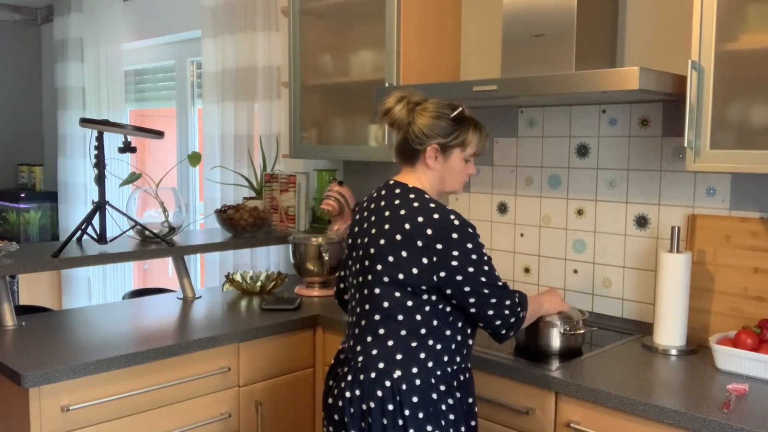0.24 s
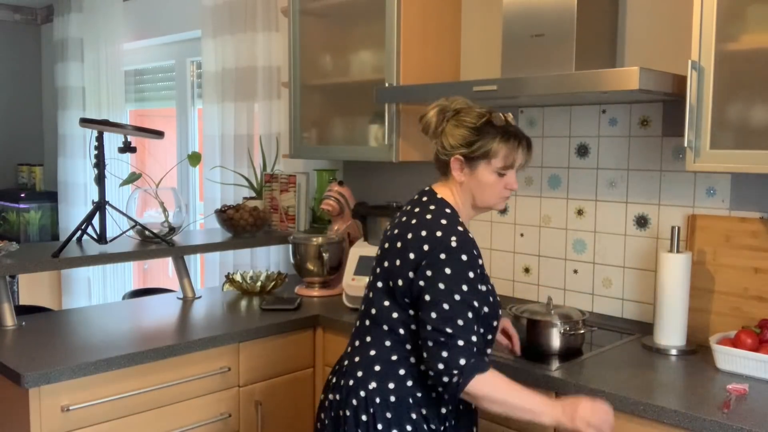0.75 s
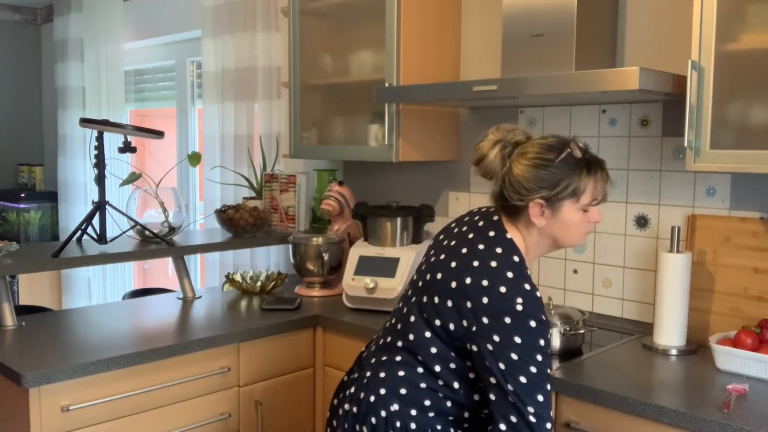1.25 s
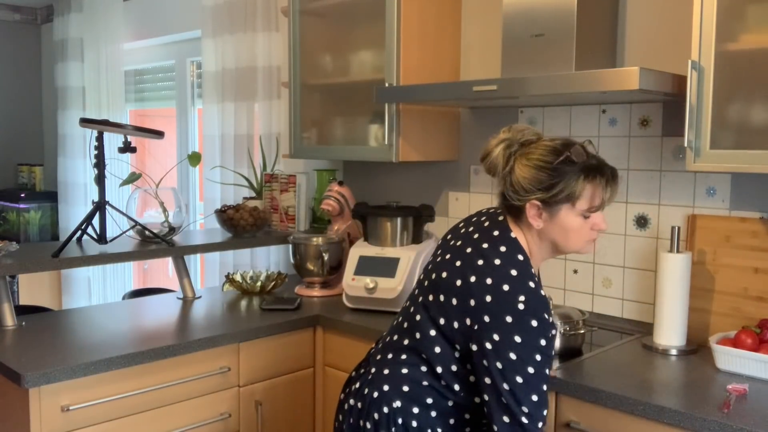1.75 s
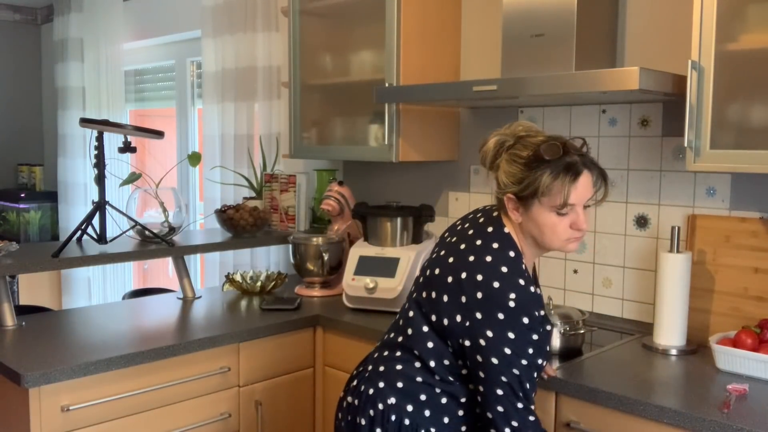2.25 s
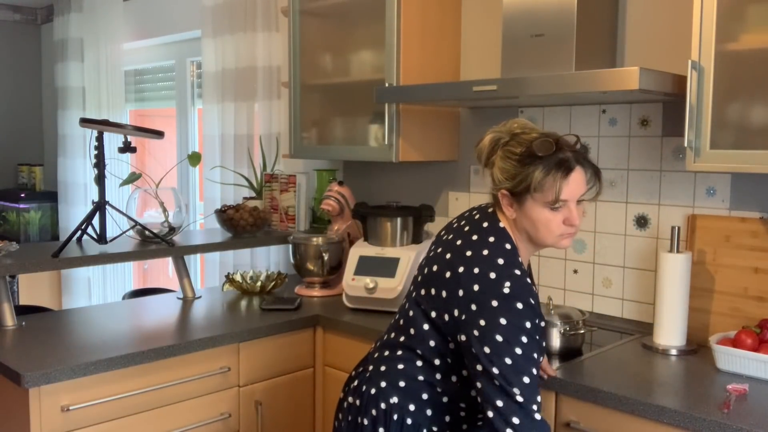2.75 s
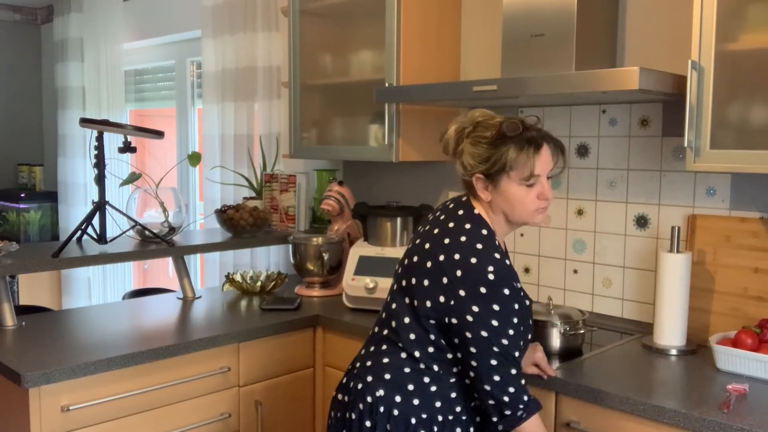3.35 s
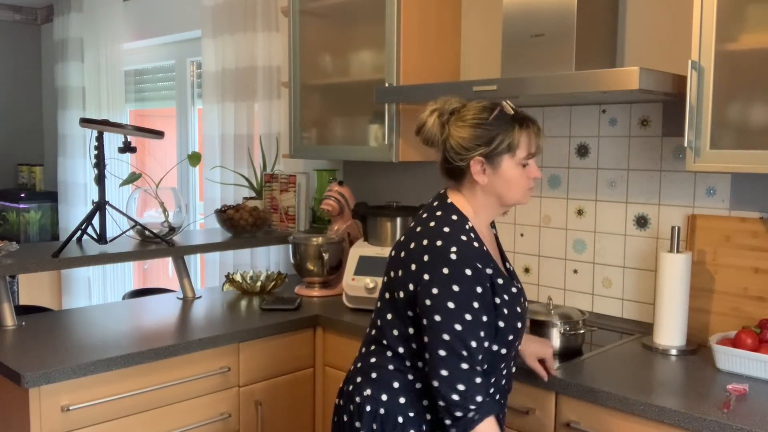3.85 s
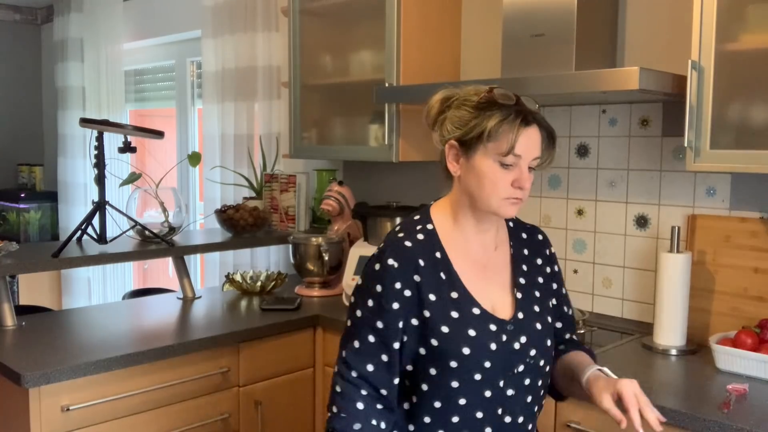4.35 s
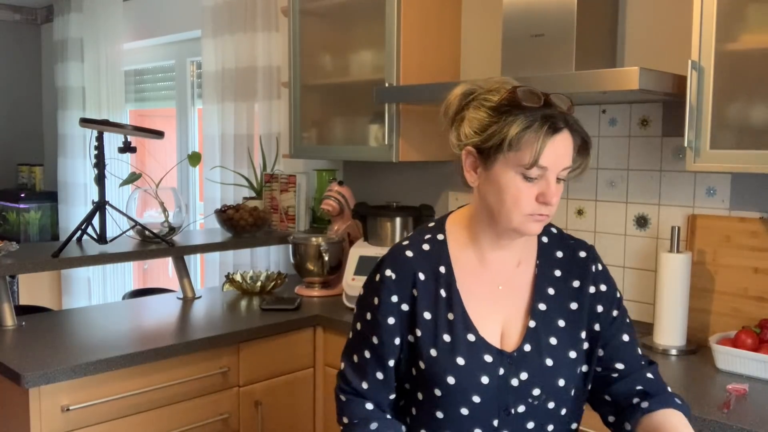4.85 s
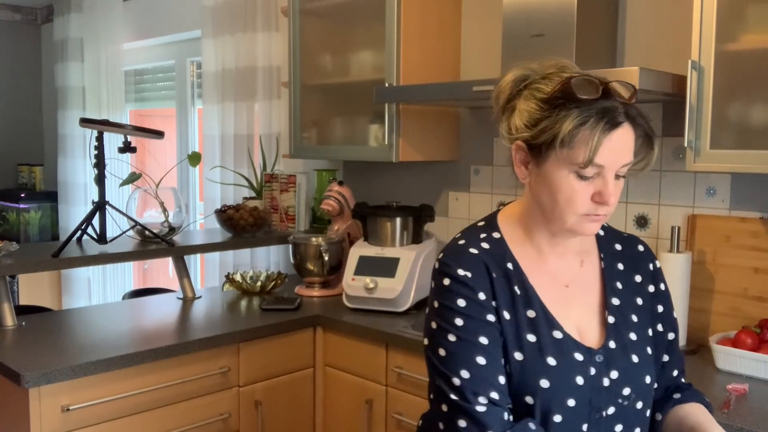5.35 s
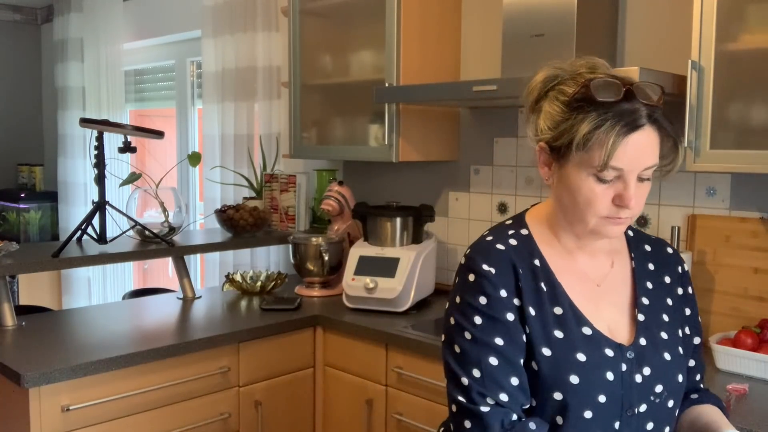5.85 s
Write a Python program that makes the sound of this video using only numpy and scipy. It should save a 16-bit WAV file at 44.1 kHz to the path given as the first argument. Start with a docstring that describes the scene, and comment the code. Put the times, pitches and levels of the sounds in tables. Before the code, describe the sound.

A steel lid clatters onto a pot, a wooden cupboard pull-out bangs open, a drawer thuds shut, and utensils are rummaged over an appliance hum.

```python
"""A steel lid clatters onto a pot in a tiled kitchen, over the hum of an appliance. A wooden cupboard front is
then pulled open and bangs, a drawer rolls shut with a deep thud, and utensils are picked over until one rings.
Blows are noise bursts filtered by contact, body modes and a diffuse room; panels boom as decaying sines,
rubbing is grainy filtered noise, and the hum and ringing are sums of sines."""
import sys
import numpy as np
from scipy import signal
from scipy.fft import rfft, irfft, next_fast_len
from scipy.io import wavfile
from scipy.ndimage import uniform_filter1d, map_coordinates

SR = 44100
rng = np.random.default_rng(int(sys.argv[2]) if len(sys.argv) > 2 else 0)


def materialize(psi):
    """Save the field psi as 16-bit PCM at rate SR to the path in sys.argv[1].

    A 1-D psi becomes a single channel; in a 2-D psi each row is a channel.
    """
    bounded = np.clip(np.atleast_2d(psi).T, -1, 1)
    quanta = np.round(bounded * 32767).astype(np.int16)
    wavfile.write(sys.argv[1], SR, quanta)


N = 269451
SIZE, BEFORE = 32768, 1764  # samples in one blow or boom, and samples of a blow ahead of its contact

# Broad colour of a utensil. Each row: frequency in Hz, gain in dB.
UTENSIL_COLOUR = [(100, 1), (250, 3), (400, 3), (650, -1.5), (1200, -4), (2500, -3.5), (4500, -5),
                  (6500, -10.5), (9000, -7.5), (13000, -13.5), (16000, -18)]


def amp(db):
    """Level law: decibels become an amplitude ratio."""
    return 10 ** (np.asarray(db) / 20)


def unit(x):
    """Normalisation: scale a signal to rms 1."""
    return x / np.sqrt(np.mean(x ** 2) + 1e-20)


def along(points, hz):
    """Interpolation of (Hz, value) points along a logarithmic frequency axis."""
    f, v = np.transpose(points)
    return np.interp(np.log(hz + 1), np.log(f + 1), v)


def wobble(rate, size=N):
    """Slow random modulation: a smooth curve through `rate` random knots a second."""
    knots = rng.standard_normal(int(size * rate / SR) + 4)
    return map_coordinates(knots, [np.arange(size) * rate / SR])


def filtered(x, response):
    """Linear filtering: multiply the spectrum of x by a response of frequency."""
    n = x.shape[-1]
    padded = next_fast_len(n + SR // 4)
    spectrum = rfft(x, padded) * response(np.fft.rfftfreq(padded, 1 / SR))
    return irfft(spectrum, padded)[..., :n]


def causal(gain):
    """Minimum phase: folding the cepstrum gives this gain a response that rings only after the blow."""
    cepstrum = irfft(np.log(np.maximum(gain, 1e-6)))
    half = len(cepstrum) // 2
    folded = np.r_[cepstrum[0], 2 * cepstrum[1:half], np.zeros(half)]
    return np.exp(rfft(folded))


def resonant(colour, modes, hz):
    """Modal resonance: a body's gain is narrow peaks standing on a broad colour."""
    peaks = sum(amp(db) ** 2 / (1 + (2 * (hz - centre) / width) ** 2) for centre, width, db in modes)
    return amp(along(colour, hz)) * np.sqrt(1 + peaks)


def stroke(s, attack, hold, t60):
    """Envelope: a linear rise to 1 by time s, a hold and an exponential decay."""
    t = np.arange(N) / SR - s
    return np.clip(1 + t / attack, 0, 1) * amp(-60 * np.maximum(t - hold, 0) / t60)


def add(track, s, sound):
    """Superposition: mix a sound into the track at time s."""
    start = round(s * SR)
    sound = sound[..., max(-start, 0):]
    part = track[..., max(start, 0):][..., :sound.shape[-1]]
    part += sound[..., :part.shape[-1]]


def diffuse(size):
    """Diffuse field: noise from all sides whose coherence at two microphones falls toward the treble."""
    # Coherence of the two channels. Each row: frequency in Hz, left-right correlation (no unit).
    alike = [(40, 0.46), (100, 0.69), (250, 0.15), (1000, 0.11), (6000, 0.04)]

    def mid_side_gains(hz):
        angle = np.arccos(np.clip(along(alike, hz), -1, 1)) / 2
        return np.array([np.cos(angle), np.sin(angle)])

    mid, side = filtered(rng.standard_normal((2, size)), mid_side_gains)
    return np.array([mid + side, mid - side])


def appliance():
    """Standing waves: each line of the mains hum has its own phase between channels; air rushes softly."""
    # Hum lines. Each row: frequency in Hz, level in dB, phase between the microphones in radians.
    lines = [(100.8, -47, 0.58), (220, -60.5, 2.9), (300.4, -55.5, 2.22), (503, -64, 2.94)]
    # Relative spectrum of the air rush. Each row: frequency in Hz, gain in dB.
    air_colour = [(20, -25.5), (40, -6), (55, -4.5), (70, 5), (85, -4.5), (135, -16), (240, -14),
                  (400, -19.5), (700, -27.5), (1100, -27.5), (2000, -38), (4000, -41), (9000, -48.5),
                  (16000, -47)]
    t, sides = np.arange(N) / SR, np.array([[.5], [-.5]])
    hum = 0
    for hz, db, apart in lines:
        level = amp(db + .6 * wobble(4)) * np.sqrt(2)  # rms to peak
        phase = 2 * np.pi * hz * t + sides * apart + 0.1 * wobble(3)
        hum = hum + level * np.sin(phase)
    air = unit(filtered(diffuse(N), lambda hz: amp(along(air_colour, hz))))
    return hum * amp([[.8], [-.8]]) + amp(-48.5) * air


def friction(modes, uneven_db, grain_db):
    """Stick-slip: rubbing in small uneven catches, heard through a body's resonances."""
    # Broad colour of rubbed surfaces. Each row: frequency in Hz, gain in dB.
    rubbed_colour = [(150, -5.5), (500, -2), (1500, -1), (2700, -6), (4500, -6.5), (6500, -12.5),
                     (9000, -19), (13000, -25.5), (16000, -29.5)]
    grain = amp(uneven_db * wobble(24) + grain_db * wobble(400))
    rubbing = rng.standard_normal((2, N)) * grain
    return unit(filtered(rubbing, lambda hz: resonant(rubbed_colour, modes, hz)))


def sliding():
    """Rolling friction: the runners' hiss swells or fades along each glide, and one thin resonance whistles."""
    # Wood gliding on runners. Each row: time of full rise in seconds, length in seconds,
    # relative level in dB, change of level in dB per second.
    glide_rows = [(1.484, 0.54, -73.5, -9), (3.4, 0.62, -63.5, 23.5), (4.075, 0.37, -52.5, -24.5),
                  (4.485, 0.022, -58, 0)]
    # Thin whistles. Each row: time of full rise in seconds, length in seconds, relative peak level in dB.
    whistle_rows = [(1.49, .36, -74.5), (4.07, 0.24, -80), (5.99, .08, -76.5)]
    # Runner resonances. Each row: frequency in Hz, width in Hz, level over the colour in dB.
    modes = [(1444, 160, 8.5), (2270, 150, 7.5), (3330, 55, 9.5), (4920, 600, 4.5), (6030, 200, 1.5)]
    attack_s, t60_s, whistle_hz = 0.081, .45, 3280
    t = np.arange(N) / SR
    glides = 0
    for s, length, db, slope in glide_rows:
        level = amp(db + slope * np.clip(t - s, 0, length))
        glides = glides + level * stroke(s, attack_s, length, t60_s)
    whistles = sum(amp(db) * stroke(s, attack_s, length, t60_s) for s, length, db in whistle_rows)
    hiss = glides * friction(modes, uneven_db=1, grain_db=1.0)
    tone = np.sin(2 * np.pi * whistle_hz * t + 0.73 * wobble(60))
    return hiss + whistles * tone


def scraping():
    """Sliding friction: utensils are pushed over wood in short strokes."""
    # Pushes. Each row: time of full rise in seconds, length in seconds, relative level in dB.
    pushes = [(4.805, 0.16, -57.5), (5.198, .17, -53), (5.427, 0.027, -48.5), (5.546, 0.0098, -51.5)]
    # Resonances of the rubbed pair. Each row: frequency in Hz, width in Hz, level over the colour in dB.
    modes = [(1570, 200, 5), (2200, 120, 3), (3350, 400, 4.5), (4370, 840, 7)]
    strokes = sum(amp(db) * stroke(s, attack=0.023, hold=length, t60=0.56) for s, length, db in pushes)
    return strokes * friction(modes, uneven_db=2.2, grain_db=2.0)


def ringing():
    """Free vibration: a brushed steel utensil sings briefly in a few pure modes."""
    # Modes of a thin steel utensil. Each row: frequency in Hz, relative peak level in dB.
    modes = [(2961, -56), (4258, -49), (5475, -60), (6982, -63)]
    t, sides = np.arange(N) / SR, np.array([[1], [-1]])
    tone = 0
    for hz, db in modes:
        phase = 2 * np.pi * hz * t + 0.54 * sides + .15 * wobble(40)
        tone = tone + amp(db) * np.sin(phase)
    return tone * stroke(5.655, attack=0.019, hold=0.064, t60=0.34)


def kitchen(direct_db, early_db, early_t60):
    """Room impulse response: direct sound, nearby cabinet fronts, then a tail decaying at each band's rate."""
    # Reverberation. Each row: frequency in Hz, time to decay by 60 dB in seconds.
    reverberation = [(60, 0.61), (250, 0.6), (1000, 0.56), (3000, 0.61), (6000, 0.52), (12000, 0.23)]
    hz, t, noise = signal.stft(diffuse(SIZE), SR, nperseg=256)
    tail = amp(-60 * t / along(reverberation, hz)[:, None])
    early = amp(early_db - 60 * t / early_t60)
    path = signal.istft(noise * (tail + early), SR, nperseg=256)[1][:, :SIZE]
    return rfft(path / np.linalg.norm(path[0])) + amp(direct_db)


def evened(spectrum, width_hz):
    """Spectral whitening: level out broad bumps, so that body and contact set the colour."""
    channel_power = np.mean(np.abs(spectrum) ** 2, 0)
    sum_power = np.abs(spectrum.mean(0)) ** 2
    bins = max(round(width_hz * SIZE / SR), 1)
    power = np.abs(uniform_filter1d(channel_power + sum_power, bins))
    return spectrum * causal((power + 1e-9) ** -.5)


def strikes(rows, colour, modes, direct_db, early_db, early_t60, click, lead):
    """Impact excitation: a build-up (lead times the rattle), a click and a rattle ring body and room."""
    # Random fine ripple of each colour, deeper toward the treble. Each row: frequency in Hz, depth in dB.
    ripple_depth = [(300, .5), (1800, 1.5), (3500, 2.4), (12000, 3)]
    ripple_hz = 44.97  # spacing of the ripple's random knots
    strike_spread_db = 2  # each blow lands on another spot, so each mode answers more or less
    out, t = np.zeros((2, N)), (np.arange(SIZE) - BEFORE) / SR
    hz = np.fft.rfftfreq(SIZE, 1 / SR)
    ripple_knots = rng.standard_normal(int(SR / 2 / ripple_hz) + 4)
    ripple = amp(along(ripple_depth, hz) * map_coordinates(ripple_knots, [hz / ripple_hz]))
    for s, db, low_hz, bright_hz, rattle in rows:
        struck = [(centre, width, level + strike_spread_db * rng.standard_normal())
                  for centre, width, level in modes]
        body = resonant(colour, struck, hz) * ripple
        t60 = np.where(t < 0, lead * rattle, rattle)
        force = rng.laplace(size=SIZE) * amp(-60 * np.abs(t) / t60)
        force = force / np.linalg.norm(force)
        force[BEFORE] += click
        # soft contacts lose the treble, light ones the bass
        contact = 1 / np.sqrt((1 + (hz / bright_hz) ** 4) * (1 + (low_hz / (hz + 1)) ** 4))
        arrival = evened(rfft(force) * kitchen(direct_db, early_db, early_t60), width_hz=70)
        sound = irfft(arrival * causal(body * contact))
        add(out, s - BEFORE / SR, amp(db - 14.0) * unit(sound))
    return out


def utensils():
    """Contact filtering: utensils are touched and put down, each contact passing its own band."""
    # Touches. Each row: start in seconds, relative level in dB, lowest frequency in Hz,
    # contact brightness in Hz, rattle in seconds.
    touches = [(4.775, -55.5, 497, 1530, 0.037), (4.808, -50, 600, 1870, 0.051),
               (4.845, -54.5, 6000, 12950, .1), (4.879, -46, 200, 2600, 0.074),
               (4.887, -48.5, 900, 2380, .012), (4.927, -39, 198, 720, 0.013),
               (4.927, -51, 1000, 12000, 0.037), (4.966, -47.5, 348, 1200, 0.037),
               (5.023, -55.5, 498, 11000, 0.054), (5.154, -53, 1500, 6030, 0.047),
               (5.175, -47, 9000, 16050, 0.098), (5.213, -46, 930, 980, .05), (5.233, -50, 850, 1800, .05),
               (5.258, -48, 850, 1090, .03), (5.283, -43.5, 880, 1050, 0.028),
               (5.421, -47, 3400, 4380, .03), (5.456, -48.5, 1400, 2810, 0.031),
               (5.524, -43.5, 2200, 3820, 0.027), (5.541, -42, 1213, 8000, 0.073),
               (5.596, -52, 900, 4000, .02), (5.65, -56, 7000, 15000, .16),
               (5.748, -52, 8830, 15840, 0.017), (5.81, -49, 7580, 15730, 0.015)]
    # Utensil resonances. Each row: frequency in Hz, width in Hz, level over the colour in dB.
    modes = [(346, 24, 9.5), (445, 18, 11.7), (590, 15, 4.5), (695, 28, 7.9), (800, 28, 8.4),
             (967, 41, 13.8), (1330, 66, 3.3), (1520, 78, 3.9), (2210, 70, 5), (3430, 67, 3.3),
             (4500, 300, 5.9)]
    return strikes(touches, UTENSIL_COLOUR, modes, direct_db=-8, early_db=4.5, early_t60=0.092,
                   click=0.45, lead=0.91)


def clink():
    """Hard impact: steel meets steel close by and bounces, so direct sound and click are strong."""
    # Bounces. Each row: start in seconds, relative level in dB, lowest frequency in Hz,
    # contact brightness in Hz, rattle in seconds.
    bounces = [(5.2803, -45.5, 3800, 4000, .012), (5.289, -49.5, 4520, 7040, .012)]
    # Steel resonances. Each row: frequency in Hz, width in Hz, level over the colour in dB.
    modes = [(4300, 140, 15.5), (4570, 180, 14)]
    return strikes(bounces, UTENSIL_COLOUR, modes, direct_db=6, early_db=9.5, early_t60=0.055,
                   click=1.1, lead=.1)


def light_knocks():
    """Soft impact: soft low bumps, then light knocks of a catch, with little treble."""
    # Bumps and knocks. Each row: start in seconds, relative level in dB, lowest frequency in Hz,
    # contact brightness in Hz, rattle in seconds.
    knocks = [(1.75, -57, 150, 270, .1), (1.93, -56, 130, 260.4, .08), (2.002, -41.5, 700, 2100, 0.032),
              (2.016, -39.5, 750, 2200, 0.041), (2.04, -35, 800, 1700, 0.027),
              (2.051, -32.5, 1050, 1900, 0.038), (2.072, -40.5, 1010, 2790, 0.027),
              (3.35, -49, 1106, 2200, 0.19)]
    # Broad colour of these knocks. Each row: frequency in Hz, gain in dB.
    colour = [(300, -5), (750, -2), (1400, -0.5), (2700, -4), (3600, -9), (6500, -13), (9000, -27),
              (16000, -34.5)]
    # Their resonances. Each row: frequency in Hz, width in Hz, level over the colour in dB.
    modes = [(740, 11, 10.5), (1188, 16, 13.5), (1285, 23, 14.5), (1463, 30, 9), (1900, 40, 6),
             (2886, 24, 8.5)]
    return strikes(knocks, colour, modes, direct_db=-12.0, early_db=5.5, early_t60=.13,
                   click=0.22, lead=0.57)


def pot():
    """Plate modes: a steel lid clatters on the pot's rim and excites many narrow resonances."""
    # Lid contacts. Each row: start in seconds, relative level in dB, lowest frequency in Hz,
    # contact brightness in Hz, rattle in seconds.
    clatter = [(.001, -29, 60, 7080, 0.098), (.021, -25.5, 60, 14000, 0.027), (.055, -34, 60, 5070, 0.059),
               (.097, -27, 60, 5400, 0.27), (.165, -27, 151, 16000, 0.045), (.182, -30, 60, 7000, 0.061),
               (.203, -35.5, 200, 4480, 0.049)]
    # Broad colour of the steel. Each row: frequency in Hz, gain in dB.
    colour = [(30, -11), (60, 17), (150, 3.5), (350, 3.5), (570, -7), (780, -.5), (1450, -2), (2000, -5),
              (3000, -7.5), (4000, -12), (6500, -10.5), (9000, -13.5), (12000, -16.5), (16000, -16)]
    # Steel resonances. Each row: frequency in Hz, width in Hz, level over the colour in dB.
    modes = [(222.5, 12.6, 12), (454, 20, 7.5), (758, 14, 7.1), (797, 14, 6.2), (906, 20, 9.9),
             (979, 16, 14), (1173, 9, 16), (1259, 27, 8), (1325, 20, 4.9), (1545, 33, 5.6), (2063, 24, 7.2),
             (1750, 24, 14), (1870, 14, 10), (1960, 22, 15), (2440, 30, 10), (2880, 24, 12),
             (2950, 19, 16.5), (3110, 23, 9.6), (3450, 35, 10.5), (3560, 40, 7.3), (4200, 66, 9.3),
             (4651, 58, 9.7), (4840, 40, 8), (5141, 30, 9), (6030, 31, 12), (6140, 30, 10), (6460, 22, 11),
             (7050, 30, 7.6)]
    return strikes(clatter, colour, modes, direct_db=-10, early_db=0.5, early_t60=0.2, click=.45, lead=.4)


def drawer():
    """Box resonance: the drawer meets its stop, each contact building up longer than it rattles."""
    # Contacts with the stop. Each row: start in seconds, relative level in dB, lowest frequency in Hz,
    # contact brightness in Hz, rattle in seconds.
    stops = [(3.725, -23.5, 149, 7000, 0.017), (3.735, -18.5, 129, 2500, 0.012),
             (3.734, -22, 904, 1900, 0.0082), (3.745, -25, 200, 2000, 0.0076),
             (3.78, -31.5, 800, 1100, 0.017), (3.82, -38, 500, 1500, 0.0064),
             (3.856, -38.5, 350, 1700, 0.011)]
    # Broad colour of the drawer box. Each row: frequency in Hz, gain in dB.
    colour = [(30, 0.5), (120, 7.5), (220, 6), (340, 4), (430, -2.5), (600, -3.5), (1000, -7.5), (1500, -5),
              (2500, -9), (4500, -9), (6500, -13.5), (8000, -31.5), (12000, -23.5), (16000, -43)]
    # Drawer resonances. Each row: frequency in Hz, width in Hz, level over the colour in dB.
    modes = [(301.4, 14, 9.5), (488, 22, 7.5), (591, 24, 8.5), (804, 25, 3), (903, 16, 11),
             (1023, 40, 14.5), (1076, 25, 9), (1210, 22, 6), (1490, 120, 3), (1650, 32, 2.5), (1770, 30, 7),
             (1980, 36, 4), (2180, 34, 9.5), (2490, 34, 7)]
    return strikes(stops, colour, modes, direct_db=-11.5, early_db=7.5, early_t60=0.066,
                   click=0.39, lead=1.33)


def pullout():
    """Frame modes: the pull-out behind the front jolts off and hits its end stop."""
    # Jolts. Each row: start in seconds, relative level in dB, lowest frequency in Hz,
    # contact brightness in Hz, rattle in seconds.
    jolts = [(2.47, -21, 60, 1150, 0.092), (2.494, -22, 59, 850, 0.11), (2.522, -22, 60, 900, 0.046),
             (2.608, -23, 110, 2000, 0.043), (2.634, -26, 110, 2000, 0.06), (2.682, -14, 100, 3400, 0.027),
             (2.692, -11.3, 90, 3300, 0.035), (2.712, -20, 110, 2200, 0.011),
             (2.815, -36.5, 1200, 2400, 0.1)]
    # Broad colour of the pull-out. Each row: frequency in Hz, gain in dB.
    colour = [(30, -7.5), (60, 6.5), (120, 9.5), (220, 3), (400, 1.5), (580, -2.5), (900, -1.5),
              (1500, -2.5), (2300, -5), (3400, -6), (5000, -10), (7000, -16), (10000, -23), (13500, -20),
              (16000, -40)]
    # Frame resonances. Each row: frequency in Hz, width in Hz, level over the colour in dB.
    modes = [(166, 12, 4), (235.7, 21, 1.5), (445, 22, 7.5), (698, 15, 6), (789.5, 20, 5.5), (938, 19, 5),
             (1010, 30, 6.5), (1230, 14, 4.5), (1272, 28, 7), (1544, 30, 5.5), (1720, 32, 4),
             (1905, 41, 8.5), (2175, 18, 6.5), (2600, 26, 7), (3206, 27, 7), (3400, 40, 9), (3560, 22, 6),
             (3860, 27, 6)]
    return strikes(jolts, colour, modes, direct_db=-11.5, early_db=2.5, early_t60=0.14, click=.5, lead=0.3)


def cupboard():
    """Panel modes: the wooden cupboard front bangs in a tight cluster of contacts."""
    # Bangs. Each row: start in seconds, relative level in dB, lowest frequency in Hz,
    # contact brightness in Hz, rattle in seconds.
    bangs = [(2.539, -15.5, 130, 15000, 0.074), (2.545, -10, 614, 1650, 0.02),
             (2.551, -13.5, 620, 951, .02), (2.553, -16.5, 130, 14000, 0.048), (2.566, -19, 600, 1700, .02),
             (2.582, -19.5, 500, 5000, 0.013)]
    # Broad colour of the wood. Each row: frequency in Hz, gain in dB.
    colour = [(30, -6.5), (60, 5.5), (110, 10), (250, 5.5), (420, -3.5), (650, -4), (900, -4.5), (1550, -3),
              (2300, -8), (3600, -7), (5000, -9), (7000, -14), (10000, -19), (13500, -17), (16000, -41)]
    # Wood resonances. Each row: frequency in Hz, width in Hz, level over the colour in dB.
    modes = [(163, 12, 5.5), (193, 12, 1.5), (576, 22, 10), (680, 40, 4.5), (786, 16, 16.5), (938, 20, 8.5),
             (1044, 18, 12), (1170, 18, 9), (1203, 22, 9.5), (1380, 40, 5), (1645, 42, 13), (1980, 52, 6.5),
             (2480, 29, 7), (3470, 20, 9), (4440, 40, 7.5), (5030, 60, 5), (5770, 40, 7),
             (11600, 130, 10.5), (13700, 120, 8.5)]
    return strikes(bangs, colour, modes, direct_db=-11.5, early_db=3.0, early_t60=0.14, click=.4, lead=0.22)


def booms():
    """Damped vibration: blows swing the cabinet panels; higher modes die sooner and differ more left to right."""
    # Deep booms. Each row: start in seconds, relative level in dB, pitch in Hz,
    # time for the pitch to decay by 60 dB in seconds.
    swings = [(0.032, -33, 45.3, 0.88), (.172, -30, 45.4, 0.64), (2.475, -16, 55.66, 1),
              (2.699, -10.5, 54.5, 0.58), (3.739, 0, 46.26, 0.3), (3.835, -11.5, 53.8, 0.31),
              (3.912, -23.5, 54.7, 0.56)]
    # Panel modes. Each row: multiple of the boom's pitch (no unit), level in dB.
    panel_modes = [(1, 2), (1.18, -9.5), (1.42, -5), (2.02, -7.5), (2.329, -12.5), (3, -17), (3.45, -21)]
    out, t, sides = np.zeros((2, N)), np.arange(SIZE) / SR, np.array([[1], [-1]])
    for s, db, hz, t60 in swings:
        phase = 2 * np.pi * hz * t + 0.17 * sides + .15 * wobble(18, size=SIZE)
        panels = sum(amp(level - 60 * t * k ** 0.37 / t60) * np.sin(k * phase) for k, level in panel_modes)
        onset = 1 - np.exp(-t / 0.012)
        add(out, s, -amp(db) * panels * onset)
    return out


def scene():
    """Superposition: cupboard, drawer, pot and utensils over the hum."""
    blows = light_knocks() + cupboard() + pullout() + drawer() + pot() + utensils() + clink()
    rubbed = sliding() + scraping() + ringing()
    return (blows + rubbed) * amp([[.5], [-.5]]) + booms() + appliance()  # first part slightly to the left


def record(dry):
    """Mid-side filtering: the middle dips near 9 kHz, the sides fade above 11 kHz; peaks clip, the band is limited."""
    # Colour of what both sides share. Each row: frequency in Hz, gain in dB.
    mid_colour = [(22, -8), (32, 0), (7300, -0.5), (8100, -14), (9700, -19), (11000, 2)]
    # Colour of what differs between the sides. Each row: frequency in Hz, gain in dB.
    side_colour = [(7300, 0.5), (8500, 6), (10500, 4.5), (12000, -5), (16000, -25)]
    top_hz = 15830
    mid = filtered((dry[0] + dry[1]) / 2, lambda hz: amp(along(mid_colour, hz)))
    side = filtered((dry[0] - dry[1]) / 2, lambda hz: amp(along(side_colour, hz)))
    clipped = np.clip(np.array([mid + side, mid - side]), -1, 1)
    return filtered(clipped, lambda hz: hz < top_hz)


dry = scene()
out = record(dry)
materialize(out)
```